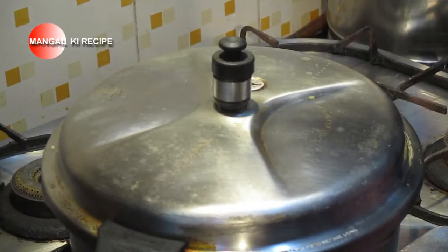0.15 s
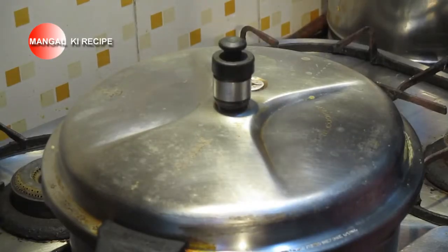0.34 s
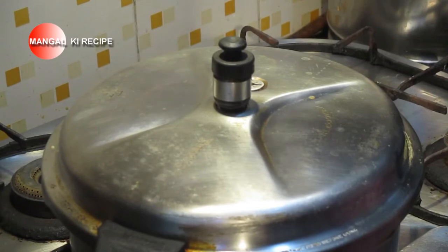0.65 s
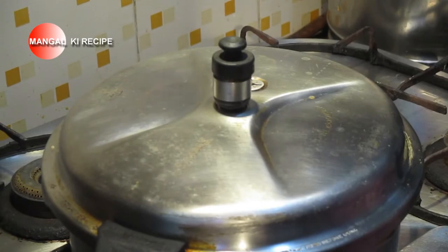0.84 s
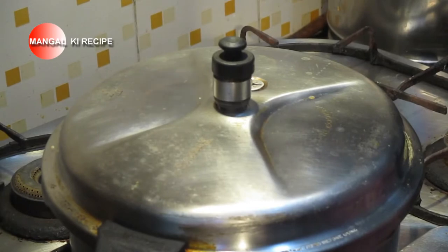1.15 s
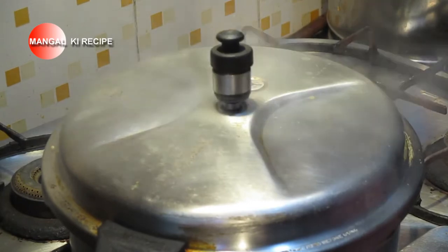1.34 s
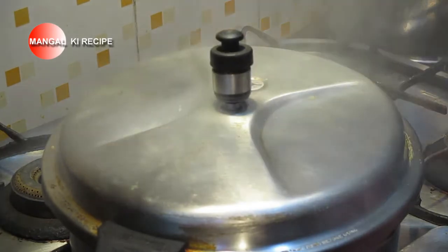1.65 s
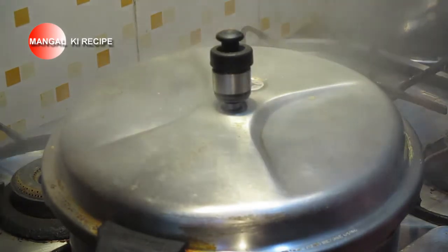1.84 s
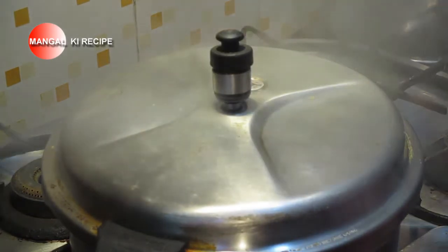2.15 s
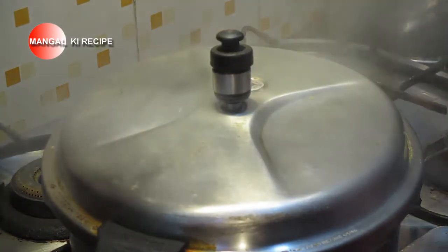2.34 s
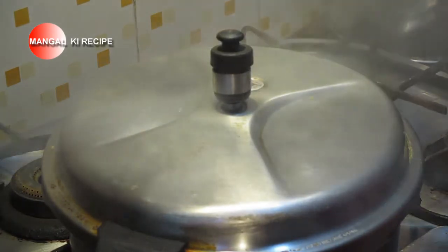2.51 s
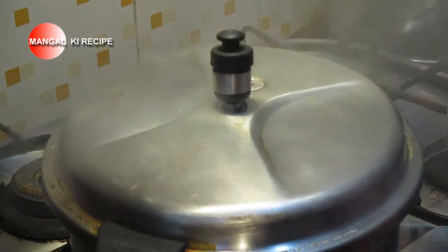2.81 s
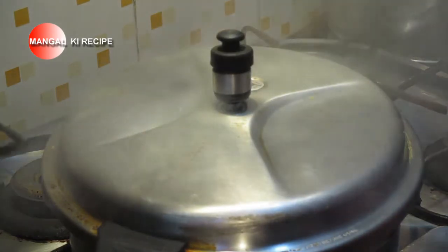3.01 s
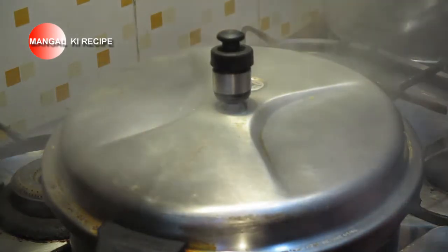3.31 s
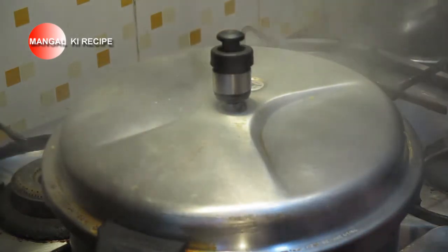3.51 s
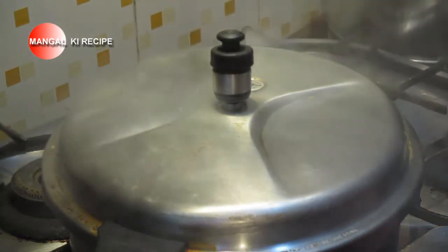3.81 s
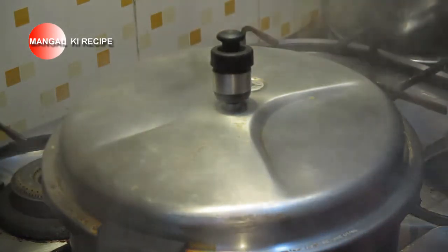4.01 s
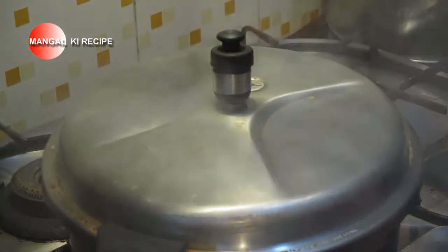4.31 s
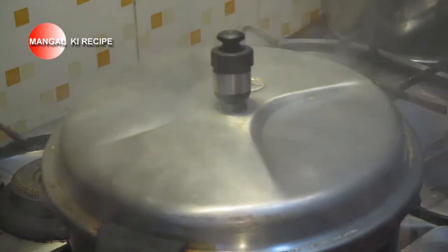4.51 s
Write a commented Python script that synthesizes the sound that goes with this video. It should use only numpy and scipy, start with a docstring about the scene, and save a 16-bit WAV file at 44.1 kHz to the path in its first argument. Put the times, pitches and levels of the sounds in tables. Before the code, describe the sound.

Close in a tiled kitchen corner, a pressure cooker hums over a gas flame while steam sputters in uneven puffs and the weight faintly rings the pot. A thin whistle peeps briefly. After one second the weight lifts with two knocks and a wet spurt, and a loud bright hiss takes over to the end, gaining a hollow roar. The microphone's automatic gain pushes the background down.

```python
"""A small pressure cooker on a gas burner in a tiled corner, close to one microphone with automatic gain. Flame
and boiling pot hum in filtered noise while steam, noise with a moving spectrum, sputters past the seated
weight; the weight jiggles, ringing the pot in dying sines, and another mode of the pot sings a thin sine near
1.5 kHz. Just after 1 s it lifts with a knock and a wet spurt, and the vent blows a loud hiss that turns the
gain down. From 3.27 s the jet swings onto the lid and gains a hollow roar, more noise in a few broad bands."""
import sys
import numpy as np
from scipy import signal
from scipy.fft import rfft, irfft
from scipy.io import wavfile
from scipy.ndimage import uniform_filter1d

SR = 44100
rng = np.random.default_rng(int(sys.argv[2]) if len(sys.argv) > 2 else 0)


def output_pcm(signal):
    """Save a mono or channel-first signal as 16-bit PCM at the path in sys.argv[1].

    Samples are clipped to [-1, 1] before scaling.
    """
    pcm = np.clip(np.atleast_2d(signal).T, -1, 1) * 32767
    wavfile.write(sys.argv[1], SR, np.round(pcm).astype(np.int16))


N = 205461
SIZE, HOP = 1024, 256  # spectral frame and its step, in samples
TIME = np.arange(N) / SR
FRAME_S = (np.arange(N // HOP + 5) * HOP / SR)[:, None]
BIN_HZ = np.fft.rfftfreq(SIZE, 1 / SR)
FINE_HZ = np.fft.rfftfreq(N, 1 / SR)


def amp(db):
    """Decibels to gain."""
    return 10 ** (np.asarray(db) / 20)


def unit(x):
    """Scales to rms 1."""
    return x / np.sqrt(np.mean(x ** 2) + 1e-20)


def curve(rows, t, order=1):
    """Column number `order` of a table at the times t."""
    rows = np.asarray(rows, float)
    return np.interp(t, rows[:, 0], rows[:, order])


def envelope(rows):
    """Gain from (time_s, level_db) rows, silent outside them."""
    inside = (TIME >= rows[0][0]) * (TIME <= rows[-1][0])
    return amp(curve(rows, TIME)) * inside


def colour(points, hz):
    """A spectrum in dB, joined on a log-frequency axis."""
    f, db = np.transpose(points)
    return np.interp(np.log(hz + 1), np.log(f + 1), db)


def bell(x, centre, width):
    """A smooth hump of height 1."""
    return np.exp(-2 * ((x - centre) / width) ** 2)


def peaks(rows, x):
    """Gain in dB of a set of humps and dips, each (centre, width, dB), along frequency or time."""
    return sum(db * bell(x, centre, width) for centre, width, db in rows)


def noise(db):
    """Steady noise of rms 1 with the given spectrum."""
    white = rng.standard_normal(N)
    return unit(irfft(rfft(white) * amp(db), N))


def wander(rate_hz):
    """Random wavering of rms 1, smooth above about rate_hz."""
    white = rng.standard_normal(N)
    return unit(irfft(rfft(white) * bell(FINE_HZ, 0, rate_hz), N))


def patches(count, size):
    """Random patches of rms 1, `count` frames long and `size` bins wide."""
    field = rng.standard_normal((len(FRAME_S), len(BIN_HZ)))
    return unit(uniform_filter1d(uniform_filter1d(field, count, axis=0), size, axis=1))


def burner(level_db=-34.5, flicker_db=0.3):
    """Steady low roar of the flame, and the wavering drone of the boiling pot."""
    # spectrum of the roar: frequency_hz, density_db
    roar_colour = [(20, -26), (33, -16), (46, -3.5), (70, -5.5), (130, -1), (300, -2.5), (650, -1),
                   (1200, -4.5), (2200, -13), (6000, -15), (16000, -45)]
    # resonances in the roar: centre_hz, width_hz, gain_db
    roar_peaks = [(173.4, 32, 5.6), (512, 65, 2.3)]
    # drone of the pot: time_s, level_db
    drone_level = [(0, -46), (1.1, -46), (1.7, -51), (2.3, -45.5), (3.0, -41.5), (3.5, -51), (3.9, -46),
                   (4.66, -46)]
    drone_hz, drone_width_hz = 96, 13
    roar = noise(colour(roar_colour, FINE_HZ) + peaks(roar_peaks, FINE_HZ))
    detuning = 2 * (FINE_HZ - drone_hz) / drone_width_hz
    drone = noise(-20 * np.log10(1 + detuning ** 2))
    return roar * amp(level_db + flicker_db * wander(6)) + drone * amp(curve(drone_level, TIME))


def bobbing(t):
    """Change of flow in dB as the weight bobs: round puffs, and dips with a quick fall and own recovery."""
    # the weight bobs up and lets out a puff: peak_s, length_s, rise_db
    puffs = [(.015, .088, 8), (.195, 0.1, 6.5), (.412, .093, 9.5), (.589, .063, 2.5), (.777, .08, 2.9),
             (.929, .066, 3), (1.058, 0.011, 3.5), (2.067, .026, 2), (2.978, .023, 1.7), (4.085, .29, 1.3)]
    # the weight slips down and pinches the jet, then the flow returns, quickly or slowly:
    # start_s, depth_db, recovery_s
    slips = [(.304, 4.8, .015), (.7, 5, .026), (1.207, 4.2, 0.027), (1.285, 3, .027), (1.418, 1.4, 0.19),
             (1.991, 1.5, 0.092), (2.071, 2.2, 0.099), (2.594, .9, 0.17), (3.059, 1.5, 2),
             (4.166, 3.9, .24)]
    fall_s = .02
    db = peaks(puffs, t)
    for s, depth_db, recovery_s in slips:
        fall = np.clip((t - s) / fall_s, 0, 1)
        recovery = np.exp(-np.maximum(t - s - fall_s, 0) / recovery_s)
        db = db - depth_db * fall * recovery
    return db


def vent(drift_db=1.02, eddy_db=0.5, flutter_db=0.4, sputter_db=0.8, spit_db=-13, spits_per_s=900):
    """Turbulent steam: a narrow gap sings near 5 kHz, the open vent hisses far into the treble."""
    # height of the weight: time_s, lift (0-1)
    lift_rows = [(1.103, 0), (1.16, 0.31), (1.22, 0.63), (1.27, 0.79)]
    # hiss with the weight seated, and with it lifted: frequency_hz, density_db
    seated_colour = [(300, -11), (1300, -14), (2200, -11.5), (3800, -6.5), (4700, -3.5), (5250, 4),
                     (5850, -3), (6700, -5.5), (7700, -11.5), (10200, -8.5), (11200, -12.5), (12200, -19),
                     (13500, -24.5), (16000, -23)]
    lifted_colour = [(150, -46), (500, -39), (900, -25.5), (1250, -18), (2000, -12.5), (3600, -7),
                     (4600, -2.5), (5400, -1.5), (7300, -1.5), (9000, -0.4), (11700, -2), (12500, -4.5),
                     (13300, -9.5), (14600, -19.5)]
    # level of the treble: time_s, gain_db
    treble_level = [(1.0, -.4), (1.3, .9), (1.85, 1.8), (2.1, 0.7), (2.5, 1.8), (2.8, -0.5), (3.08, 1.3),
                    (3.45, 0), (3.9, -.6), (4.1, 1.7), (4.35, -.8), (4.66, 0.5)]
    treble_share = 0.18  # the treble also follows this share of the bobbing
    # edge tones at the rim; they jump as the weight turns and sink as the pressure falls:
    # start_s, length_s, pitch_hz, width_hz, sink_octaves_per_s
    edge_tones = [(1.11, .07, 5700, 1100, 0), (1.3, .85, 8450, 300, .02), (2.1, 1.2, 6300, 550, .19),
                  (2.17, 1.13, 12900, 1300, .12), (2.88, .2, 9200, 350, 0), (3.33, 1.4, 4770, 300, .02),
                  (3.45, 1.3, 4120, 550, 0.01), (3.76, .35, 7700, 220, 0)]
    edge_db, edge_fade_s = 2.7, .08

    lift = np.clip(curve(lift_rows, FRAME_S), 0, 1)
    db = (1 - lift) * colour(seated_colour, BIN_HZ) + lift * colour(lifted_colour, BIN_HZ)
    treble_db = curve(treble_level, FRAME_S) + treble_share * bobbing(FRAME_S)
    db = db + treble_db * np.clip((BIN_HZ - 6000) / 2500, 0, 1)
    for s, length, hz, width, sink in edge_tones:
        age = FRAME_S - s
        held = np.clip(.5 + np.minimum(age, length - age) / edge_fade_s, 0, 1)
        db = db + edge_db * held * bell(BIN_HZ, hz * 2 ** (-sink * age), width)
    # the rocking weight shifts the colour slowly, eddies shift it fast
    drift = drift_db * patches(count=70, size=3)
    eddies = eddy_db * patches(count=5, size=24)
    shape = amp(db + drift + eddies)
    shape /= np.sqrt(np.mean(shape ** 2, axis=1, keepdims=True))

    # droplets torn apart in the jet add tiny cracks to the rush
    spits = rng.uniform(-0.97, 1, N) * (rng.random(N) < spits_per_s / SR)
    rush = unit(rng.standard_normal(N) + amp(spit_db) * unit(spits))
    frames = signal.stft(rush, nperseg=SIZE, noverlap=SIZE - HOP)[2]
    shaped = frames * shape[:frames.shape[1]].T
    hiss = signal.istft(shaped, nperseg=SIZE, noverlap=SIZE - HOP)[1][:N]

    # the wet leak sputters unevenly and swells just before the lift; the open jet is steadier
    leak_db, open_db, sag_db_per_s = -29.75, 1.2, 0.47  # the pressure slowly sags
    strain_s, strain_db = 0.19, 8.5
    open_s, flutter = TIME - lift_rows[0][0], wander(55)
    strain = np.clip(1 + open_s / strain_s, 0, 1)
    leak = amp(leak_db + strain_db * strain + sputter_db * flutter)
    jet = curve(lift_rows, TIME) * amp(open_db - sag_db_per_s * open_s + flutter_db * flutter)
    return hiss * (leak + jet) * amp(bobbing(TIME))


def knocks(thud_t60=0.095, attack_s=0.0025):
    """The weight jiggles on its stem: each knock is a short dull thud and one dying mode of the pot."""
    # start_s, level_db, pitch_hz, ring_t60_s, thud_db (against the ring)
    knock_rows = [(.02, -39, 648, .8, -14), (.125, -34, 505, .8, -8), (.175, -38, 757, .9, -14),
                  (.455, -35, 507, 1.3, -8), (.61, -40, 805, .6, -14), (1.207, -17, 503, .3, -2),
                  (1.292, -22, 642, .52, -10)]
    out = np.zeros(N)
    for s, db, hz, t60, thud_db in knock_rows:
        age = np.maximum(TIME - s, 0)
        ring = np.sin(2 * np.pi * hz * age) * amp(-60 * age / t60)
        thud_band = noise(-20 * np.log10(1 + (6 * (FINE_HZ / hz - 1)) ** 2))
        thud = thud_band * amp(thud_db - 60 * age / thud_t60)
        out += amp(db) * (ring + thud) * (1 - np.exp(-age / attack_s))
    return out


def pot_tone(pitch_hz=1485, waver=0.0043):
    """A thin, slightly unsteady tone near 1.5 kHz, one more ringing mode of the pot."""
    # time_s, level_db
    tone_level = [(.18, -62.5), (.27, -43), (.35, -37.5), (.4, -50), (.5, -45), (.58, -65)]
    turns = np.cumsum(pitch_hz * (1 + waver * wander(53))) / SR
    return envelope(tone_level) * np.sqrt(2) * np.sin(2 * np.pi * turns)


def spurt(rough_db=-1.5):
    """Water standing in the vent is blown out as the weight lifts, with a lower, rougher rush."""
    # time_s, level_db
    spurt_level = [(1.09, -46), (1.145, -20), (1.21, -14), (1.265, -7.3), (1.29, -20), (1.42, -36)]
    # frequency_hz, density_db
    spurt_colour = [(200, -30), (700, -12), (900, 0.5), (1400, 0.5), (2200, 3.5), (3600, 7.5), (5200, 4),
                    (8000, -16), (16000, -35)]
    return noise(colour(spurt_colour, FINE_HZ)) * envelope(spurt_level) * amp(rough_db * wander(120))


def graze(start_s=3.27, rise_s=0.095, level_db=-15.5, rough_db=-0.5, flow_share=0.27):
    """The jet skims the lid and roars in a few broad bands, in step with the flow."""
    # frequency_hz, density_db
    roar_colour = [(250, -33), (520, -15), (720, -11.5), (810, 2), (920, 4), (1040, -15), (1130, 3.5),
                   (1280, 2.5), (1380, -1.5), (1680, -0.5), (1900, 0), (2200, -1), (2550, -1),
                   (8000, -13.5)]
    # for a while the jet hits the lid squarely: peak_s, length_s, rise_db
    square_hits = [(3.95, 0.36, 3)]
    swing = np.clip((TIME - start_s) / rise_s, 0, 1)
    level = swing * amp(level_db + peaks(square_hits, TIME) + flow_share * bobbing(TIME))
    return noise(colour(roar_colour, FINE_HZ)) * level * amp(rough_db * wander(40))


def corner(x, lid_echo=0.21, lid_echo_s=.001655, tiles_db=-14, tiles_t60=0.096):
    """The lid mirrors the vent; tiles and pans add a short spray of echoes and standing waves."""
    # standing waves between the lid, the stove and the tiles: centre_hz, width_hz, gain_db
    standing_waves = [(1507, 50, 4.1), (1604, 50, -4.3), (1766, 50, -3.6), (1852, 50, 3.5), (2024, 90, 2.5),
                      (2207, 90, -2.2), (2573, 50, 3.4), (3047, 90, -2.7), (3273, 160, 2.6),
                      (3488, 90, -3.7), (4048, 50, -3.9), (4124, 50, 3.9), (4285, 50, 3.3), (4457, 50, 3.1),
                      (5146, 90, 2.8), (5685, 50, 4.7), (5986, 160, -2.5), (6309, 160, 1.9),
                      (7095, 50, 3.0), (7354, 50, -3.5), (8258, 50, 3.0), (8818, 50, 3.7), (9701, 90, -2.8),
                      (10056, 50, 3.4), (10336, 90, -2.3), (10573, 90, 3.2), (10724, 90, -2.4),
                      (10971, 50, -3.8), (11133, 160, 2.0), (11779, 160, 2.3)]
    age = TIME[:SR // 4]
    signs = rng.choice([-1., 1.], len(age))
    taps = signs * (rng.random(len(age)) < 3000 / SR) * (age > .004)  # about 3000 echoes per s
    taps *= amp(-60 * age / tiles_t60)
    taps *= amp(tiles_db) / np.linalg.norm(taps)
    taps[0] += 1  # direct sound
    taps[round(lid_echo_s * SR)] += lid_echo
    gain = amp(peaks(standing_waves, np.fft.rfftfreq(2 * N, 1 / SR)))
    standing = irfft(rfft(x, 2 * N) * gain)[:N]
    return signal.oaconvolve(standing, taps / np.linalg.norm(taps))[:N]


def scene():
    """All sources reach one microphone, heard alike in both channels."""
    steam = corner(vent() + spurt() + graze())
    mono = steam + burner() + knocks() + pot_tone()
    return np.array([mono, mono])


def record(dry):
    """Gain control turns everything down under the hiss; the highest peaks are rounded; then the band limit."""
    limit_db, range_db, fall_db_per_s, recover_db_per_s = -19, 14.5, 90, 10
    ceiling, cutoff_hz = .9, 15780
    power = uniform_filter1d(dry[0] ** 2, 4 * HOP)[::HOP]
    duck_db = [0.]
    for excess_db in 10 * np.log10(abs(power) + 1e-12) - limit_db:
        step_db = np.clip(excess_db - duck_db[-1], -recover_db_per_s * HOP / SR, fall_db_per_s * HOP / SR)
        duck_db.append(np.clip(duck_db[-1] + step_db, 0, range_db))
    ducked = dry * amp(-np.interp(TIME, TIME[::HOP], duck_db[1:]))
    rounded = ducked / (1 + (ducked / ceiling) ** 10) ** (1 / 10)
    low_pass = signal.firwin(511, cutoff_hz, window=("kaiser", 9), fs=SR)
    return signal.oaconvolve(rounded, low_pass[None], "same")


dry = scene()
out = record(dry)
output_pcm(out)
```